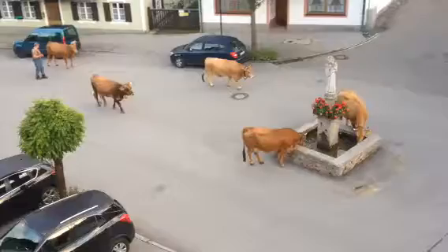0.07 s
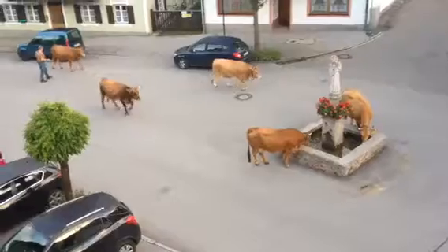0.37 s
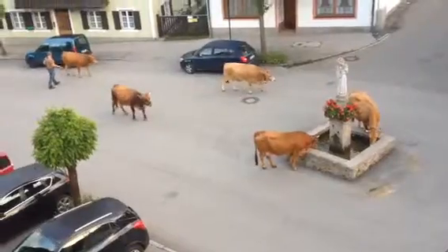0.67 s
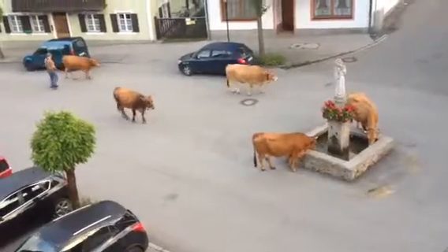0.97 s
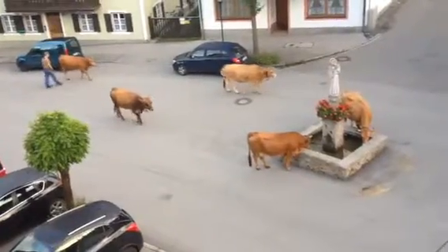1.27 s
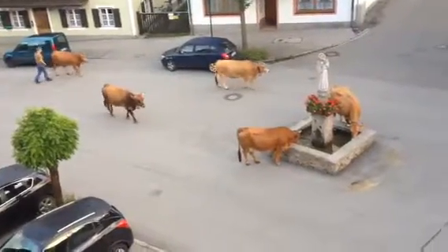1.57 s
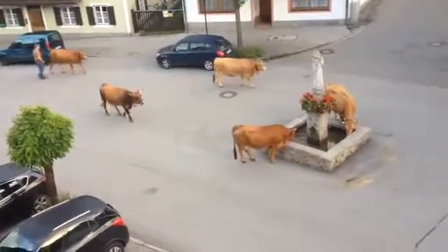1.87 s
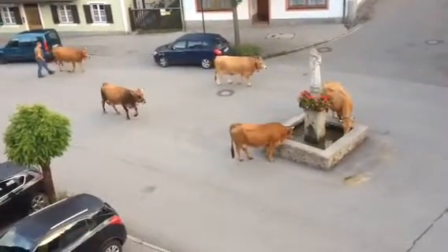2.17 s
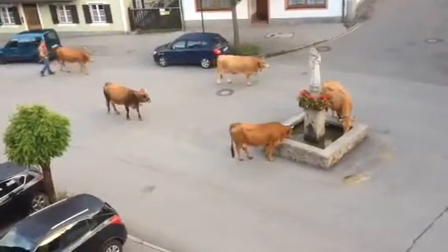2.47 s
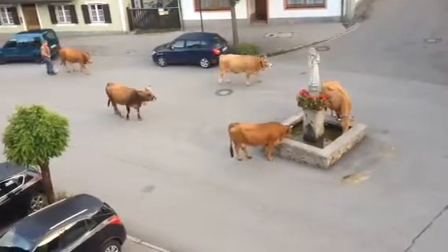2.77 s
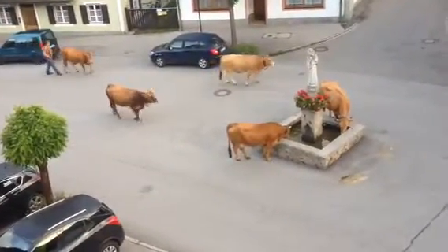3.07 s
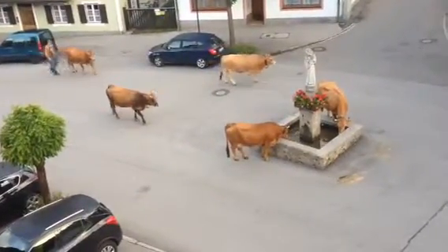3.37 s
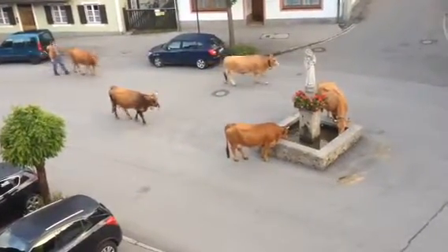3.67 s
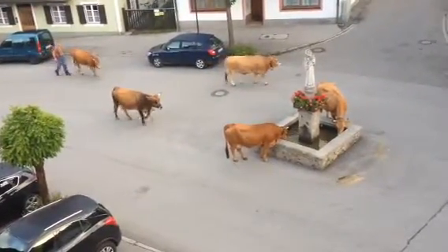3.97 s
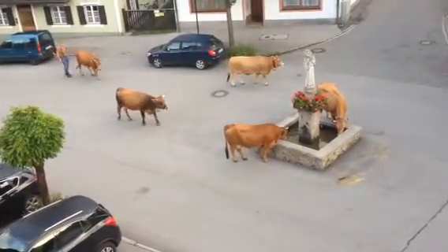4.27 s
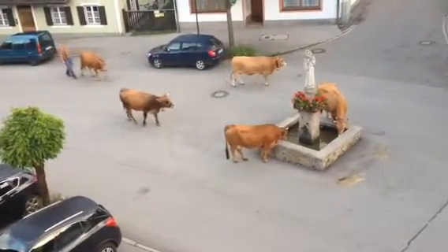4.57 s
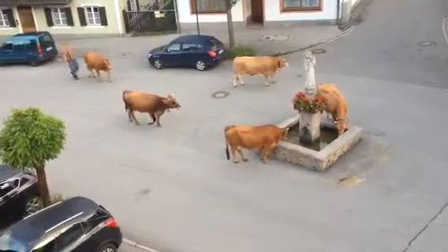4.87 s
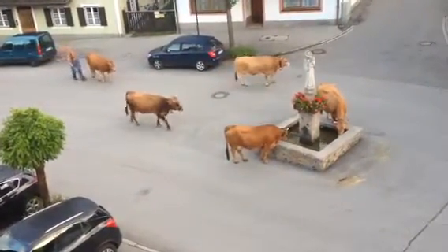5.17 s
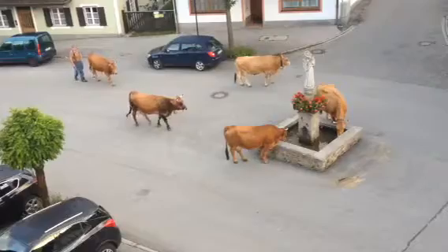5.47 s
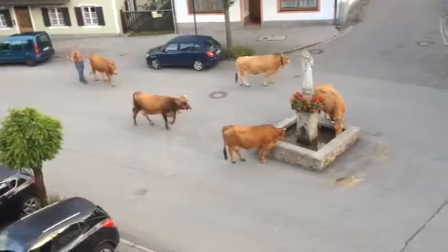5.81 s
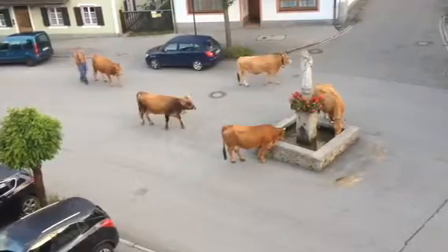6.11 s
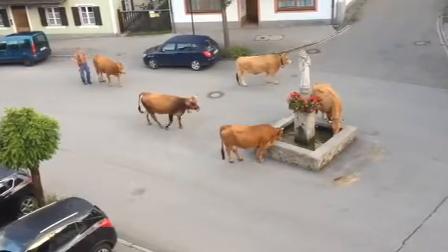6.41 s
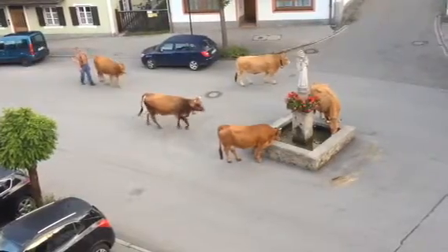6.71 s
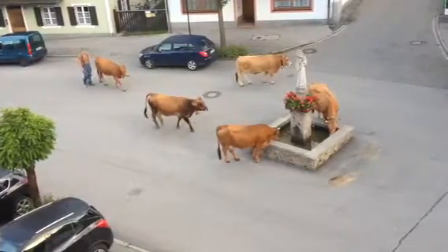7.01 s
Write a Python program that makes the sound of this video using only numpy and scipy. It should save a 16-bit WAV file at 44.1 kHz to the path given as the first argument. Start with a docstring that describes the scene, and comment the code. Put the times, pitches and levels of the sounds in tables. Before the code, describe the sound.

Metal cowbells clank and ring irregularly across a village square, with a few hoof scuffs and faint bird chirps.

```python
"""Cows cross a village square, heard from an upper window. A low village murmur cuts in with the first
clank of a sheet-metal bell: the clapper rings a body note, wall modes and a shimmer of high modes, and
the house fronts throw it back. A hoof scuffs, a bright and a deep bell join, and a distant bird chirps
now and then. The near bell grows louder from about three seconds; just after five comes a run of dry
knocks and a last scuff, and the bells clank on to the end."""
import sys
import numpy as np
from scipy import signal
from scipy.fft import rfft, irfft
from scipy.io import wavfile
from scipy.ndimage import uniform_filter1d, map_coordinates

SR = 44100
rng = np.random.default_rng(int(sys.argv[2]) if len(sys.argv) > 2 else 0)


def generate_wav(signal):
    """Clip the signal to [-1, 1] and save it as 16-bit WAV at the path in sys.argv[1]."""
    frames = np.transpose(np.atleast_2d(signal))
    scaled = np.clip(frames, -1, 1) * 32767
    pcm = np.round(scaled).astype(np.int16)
    wavfile.write(sys.argv[1], SR, pcm)


N = 319725

# tone of the village murmur: frequency_hz, level_db (table levels are relative throughout)
VILLAGE_COLOUR = [(25, 17), (70, 2.5), (100, -0.5), (140, 4.5), (200, 2.5), (320, -1), (600, 0), (1000, -1),
                  (2000, 1), (4000, -10), (7000, -14), (15000, -24.5)]
# clapper blows: start_s, strength_db, strike_place (-1..1), body_boost_db, low_wall_boost_db,
# jangle_boost_db, hardness_db_per_octave, sing_hz, sing_boost_db, second_sing_hz, second_sing_boost_db
NEAR_BLOWS = [(0.119, -41.5, 0.44, 9, 13.5, 17, -4, 3784.0, 17, 1993.0, 2),
              (0.609, -42, -0.42, 5, 4.5, 9.5, -1, 7410.0, 11, 4040.0, 16),
              (0.865, -45.5, 0.33, 3.5, 5.5, 8, 1.5, 3784.0, 14, 1993.0, -1),
              (1.16, -38.5, 0.66, 0, -1, 8.5, 0.5, 3878.0, 18, 4142.0, 5),
              (1.882, -48.5, -0.22, 9.5, 9, 1, 4, 4142.0, 17.5, 3878.0, 14),
              (2.296, -43, 1, 0, 4.5, 11.5, 2.5, 2158.0, 17.5, 3878.0, 32.5),
              (2.554, -43, 1, -4.5, -4.5, 9, 0, 1538.0, 4.5, 3945.0, 23.5),
              (3.031, -37, 0.31, -1.5, -1.5, 3.5, 3, 4142.0, 13.5, 4765.0, 3),
              (3.333, -32.5, -0.15, -3, -2.5, -2, 1, 4142.0, 4, 964.0, 8.5),
              (3.726, -25, -0.15, -4.5, -3.5, 0.5, 1.5, 964.0, 4, 4660.0, 0),
              (4.128, -31, -0.077, -5, 7.5, 7, -1, 5510.0, 16.5, 8016.0, 16),
              (4.453, -31.5, 0.62, -5, -6.5, 3.5, 2, 4660.0, 9, 3353.0, 2.5),
              (4.926, -27, -0.16, -0.5, -2.5, 2, 2.5, 4142.0, 8.5, 964.0, 7.5),
              (4.996, -45, -0.54, 3, 10, -2, -2, 3390, 12.5, 8016.0, 21),
              (5.083, -52, 0.15, 2.5, 4.5, 0, -2, 1538.0, 18.5, 7410.0, 20),
              (5.405, -40, 0.086, 1.5, 1, 6, 5.5, 3380, 6, 7023.0, 15),
              (5.494, -24, -0.51, -16, -4, -3.5, 1, 3340, 4, 3784.0, -2),
              (5.703, -28.5, -0.68, -3, -10.5, 0.5, -1, 964.0, 17.5, 3353.0, 9.5),
              (6.007, -23.5, -0.64, -4, 0.5, 2, 4.5, 7757.0, 18.5, 4040.0, 12),
              (6.075, -42, -0.26, 2, 8, 16, -5, 1538.0, 13.5, 1993.0, 16),
              (6.147, -35, 0.11, -2, 5.5, 2.5, -2, 1993.0, -1, 4142.0, 1),
              (6.4985, -19.5, -0.48, -9.5, -4.5, -2.5, 1, 3970, 10, 964.0, 9),
              (6.562, -38.5, -0.15, -15, 0.5, 8, 2, 1993.0, 20, 964.0, 14),
              (7.203, -28, -0.17, -4, -1, -4, 3.5, 7410.0, 11, 3784.0, 9)]
BRIGHT_BLOWS = [(0.508, -55.5, 1, 2.5, 2.5, 0.5, -1, 5900.0, 12.3, 7110.0, 9.2),
                (0.739, -51.5, 0.43, 3, -4.5, 0, -21, 2482, 11.6, 8578.0, 16),
                (0.936, -44.5, 0.001, 0, -5, -12, 0, 6560, 18, 5574.0, 22),
                (1.074, -48.5, 0.26, 5, 3, -5.5, 1.5, 9082.0, 18, 3852.0, 14.5),
                (1.736, -41, 0.025, -3, -5, -6, -7, 6608.0, 14.3, 7415.0, 12),
                (2.49, -49.5, -0.48, -6, -6, -4.5, -2.5, 7470, 14, 7110.0, 13),
                (2.767, -53.5, 0.19, 1.5, 2.5, 2, -3.5, 5060, 14, 3852.0, 10.3),
                (3.497, -40.5, -0.07, -2.5, -2, -7.5, -5, 8578.0, 22.5, 2506.0, 5.3),
                (3.805, -42, 0.026, -13, 3, -5.5, -2.5, 3852.0, 2.4, 6608.0, 13.3),
                (3.928, -56, 0.087, 9.5, 3, 8, -4, 2550, 8.9, 1388.0, 18),
                (5.085, -55, 0.38, 5.5, 1, -9, 0, 3778.0, 7.6, 5250.0, 8.2),
                (5.358, -34, -0.34, -0.5, -1.5, -18, -3, 7415.0, 11.6, 6608.0, 8.2),
                (5.671, -43.5, -0.21, 1, 1, -3, -0.5, 3778.0, 3.9, 2506.0, 7.5),
                (5.969, -45.5, -0.13, 1.5, 1, -5.5, -2.5, 5500, 6, 7415.0, 8.1),
                (6.385, -68.5, -0.066, 3, 18, -17, -5, 2506.0, 2, 1388.0, 3),
                (6.788, -51, -0.58, 5, 6.5, -9, 2, 1345.0, 13.7, 5108.0, 14),
                (6.892, -42, 0.011, 2.5, 0.5, 0, -5.5, 5108.0, 13.5, 7452.0, 5)]
DEEP_BLOWS = [(0.692, -50, 0.076, -2.5, 3, 5, -4, 4338.0, 20, 5102.0, 9.8),
              (0.9, -38.5, 0.18, -4, -1, -2.5, -3.5, 6340, 11.7, 4338.0, 14.5),
              (1.577, -51, 0.064, 7.5, 1.5, 1.5, -0.5, 5400.0, 18, 6790.0, 28),
              (1.622, -68, 0.17, 0, -5, -2, 0, 430.0, 28.6, 4128.0, 24),
              (1.917, -49, 0.25, 2, 1, 2.5, -5, 4980, 8.3, 3615.0, 6.7),
              (2.132, -50.5, -0.54, 1, 0, 4.5, -2.5, 3044.0, 6.6, 5400.0, 16),
              (2.474, -49, -0.35, -0.5, -2, 3, -10, 5570.0, 28, 1945.0, 8.2),
              (3.17, -57, -0.18, -6, 4, 10.5, -4.5, 430.0, 22.2, 3615.0, 11),
              (3.396, -52, -0.29, 6, 4.5, 0, 0, 1945.0, 3, 6790.0, 9.5),
              (3.468, -51, 0.23, 1, -24, 3.5, 2, 430.0, 9, 6292.0, 8.0),
              (3.682, -48.5, 0.5, -3, -1.5, -2, 0, 3044.0, 13, 2968.0, 7.7),
              (3.928, -43.0, -0.1, 1, 3.5, -6, 0, 8350, 22, 8000.0, 14),
              (4.245, -38.5, -0.0089, -7, -3.5, 0.5, -8, 5060, 11, 430.0, 5.7),
              (4.844, -51, 0.48, -1, 7, -4, 1.5, 8000.0, 15, 4128.0, 3),
              (5.358, -46, -0.045, -8, -4.5, 4, -2.5, 6663.0, 34, 7507.0, 28),
              (6.884, -50, -0.052, -3, 4, 4, -2, 6292.0, 18, 4128.0, 8.1),
              (6.895, -39.5, 0.86, -12, -12, -12.5, -1, 2855.0, 16, 3615.0, 3),
              (7.072, -63.5, -0.46, -7, 11, -2, 1, 2960, 7.1, 3044.0, 4.5)]
# bell modes: pitch_hz, level_db, t60_s, swing_db (gained as the strike place moves from 0 to 1)
NEAR_MODES = [(536.0, 12.0, 0.115, 8.0), (964.0, -30, 1.75, 3.5), (1448.0, -25.5, 0.34, -0.5),
              (1538.0, -20.5, 1.05, 13.0), (1993.0, -21.5, 0.95, -2.5), (2158.0, -28.0, 1.4, -1.5),
              (2587.0, -27.0, 0.6, 11.0), (3305.0, -27.0, 0.5, 6.0), (3353.0, -13.5, 0.2, 4.5),
              (3784.0, -18.0, 0.33, 8.0), (3878.0, -16.0, 0.15, -14.0), (3945.0, -17.5, 0.12, -2.0),
              (4040.0, -18.0, 0.22, 8.0), (4142.0, -16.5, 0.18, 6.0), (4660.0, -26.0, 0.17, -3.0),
              (4765.0, -26.0, 0.27, -2.0), (4925.0, -24.5, 0.2, 13.0), (5510.0, -20.5, 0.14, 17.0),
              (5713.0, -22.0, 0.17, 13.0), (7023.0, -27.0, 0.24, 9.0), (7410.0, -23.5, 0.17, 5.0),
              (7757.0, -21.5, 0.12, 4.0), (8016.0, -25.5, 0.14, 1.5), (8354.0, -22.0, 0.14, 4.0),
              (9044.0, -26.5, 0.14, -2.5)]
BRIGHT_MODES = [(503.0, -5.5, 0.8, 16.5), (528.0, 0.0, 0.8, -1.0), (1345.0, -21.5, 2.0, 5.0),
                (1388.0, -17.5, 2.0, -2.0), (2470.0, -12.0, 1.5, 13.0), (2506.0, -10.5, 1.6, 4.5),
                (3778.0, -8.5, 0.65, 14.0), (3852.0, -6.0, 0.6, 15.0), (4891.0, -17.5, 0.46, -8.0),
                (5108.0, -10.5, 0.26, 11.0), (5250.0, -11.5, 0.45, 12.5), (5574.0, -14.0, 0.35, -20),
                (5626.0, -24.0, 0.31, -9.0), (5790.0, -13.0, 0.26, 4.0), (5900.0, -10.5, 0.27, 11.5),
                (6608.0, -14, 0.3, -10), (7110.0, -14.5, 0.3, -1.0), (7329.0, -21.0, 0.27, -23.0),
                (7415.0, -12.5, 0.29, 13.0), (7452.0, -9.5, 0.24, 13.5), (7545.0, -16.0, 0.25, -17.0),
                (8578.0, -29.5, 0.3, 4.0), (8930.0, -19.5, 0.3, 0.5), (9082.0, -12.5, 0.18, 9.0),
                (9154.0, -17.5, 0.24, 0.0)]
DEEP_MODES = [(430.0, -8, 1.35, 4.5), (495.0, -1.5, 0.25, 1.0), (1140.0, -21.5, 2.2, 1.0),
              (1945.0, -2.5, 1.5, 12.0), (2008.0, -6.0, 1.5, -10.0), (2855.0, -13.5, 0.85, -16.0),
              (2968.0, -10.5, 0.8, -7.0), (3044.0, -8.5, 0.55, -25.0), (3615.0, -10, 0.5, 7.0),
              (4128.0, -12.0, 0.65, 15.0), (4338.0, -13.5, 0.55, -19.0), (5048.0, -18.5, 0.55, 7.0),
              (5102.0, -12.5, 0.28, 9.5), (5400.0, -13.0, 0.42, 7.5), (5570.0, -30.0, 0.5, 21.5),
              (5865.0, -19.0, 0.5, 7.0), (6140.0, -16.5, 0.25, 8.5), (6292.0, -14.5, 0.35, -2.0),
              (6663.0, -27.0, 0.28, 4.0), (6790.0, -22.5, 0.25, -10.5), (7249.0, -16.5, 0.27, -6.5),
              (7390.0, -9.0, 0.25, -6.5), (7507.0, -22.0, 0.27, -3.5), (7620.0, -19.5, 0.3, -21.0),
              (8000.0, -17.0, 0.15, 0.0), (8179.0, -24.5, 0.26, 3.5), (9938.0, -30.5, 0.23, 22.5)]
# tone of the crowded high modes and the contact tick: frequency_hz, level_db
NEAR_SHIMMER = [(1200, -12), (2500, -39.5), (4000, -23.5), (6000, -26.5), (8500, -26.5), (11000, -37),
                (15000, -46)]
BRIGHT_SHIMMER = [(1200, -1), (2500, -45), (4000, -25), (6000, -5.5), (8500, -10.5), (11000, -17),
                  (15000, -24.5)]
DEEP_SHIMMER = [(1200, -29), (2500, -20.5), (4000, -18), (6000, -18.5), (8500, -14.5), (11000, -23),
                (15000, -29)]
# the bell's upper ringing suddenly drops or lifts: start_s, change_db
NEAR_RING_STEPS = [(0.3, 0), (5.2, -13), (5.797, -9)]
BRIGHT_RING_STEPS = [(2.975, -3), (5.82, -7), (5.925, -17)]
DEEP_RING_STEPS = [(1.1, -1.5), (3.8, 2), (4.5, 2.5)]
# slaps off the ground and house fronts: delay_s, level_db
ECHOES = [(.012, -48), (.058, -18), (0.071, -20.5)]
# reverb of the square: band_hz, t60_s, level_db
REVERB_BANDS = [(241, 1.4, -8.5), (940, 0.43, -8.5), (2000, 0.7, -7.5), (3320, 1, -3.5), (5700, 0.72, -9),
                (14000, 0.42, -5)]
# hooves on paving: start_s, level_db, rise_s, t60_s, tilt_db_per_octave, grain_db
SCUFFS = [(0.25, -57.5, 0.029, 0.73, -23, 2), (2.9, -59.5, 0.093, 1, -18.5, 2),
          (3.23, -59, 0.044, 0.44, -19.5, 6), (5.675, -42, 0.03, 0.38, -7, 1)]
# tone of a scuff: frequency_hz, level_db
SCUFF_COLOUR = [(70, -38), (160, -7.5), (400, 0), (650, 16.5), (1000, 7), (1600, 16), (2500, 3),
                (5000, -13)]
# falling bird chirps: start_s, start_pitch_hz, end_pitch_hz, length_s, level_db
CHIRPS = [(1.298, 4670, 3470, 0.1, -47.5), (3.18, 4550, 3410, 0.11, -49.5),
          (4.661, 4230, 3310, 0.11, -49.5), (5.275, 5100, 4130, 0.044, -45.5),
          (6.683, 3080, 2910, 0.061, -44)]
# dry knocks close by: start_s, level_db, t60_s, thud_db, tilt_db_per_octave
KNOCKS = [(5.207, -39, 0.021, -31, 21), (5.269, -39, 0.04, -34, 6), (5.331, -46, 0.18, -14, 9.5),
          (5.65, -37, 0.094, 3.5, 7), (5.677, -41.5, 0.07, 0, -4), (5.743, -39.5, 0.06, 1, -5)]
# tone of a knock: frequency_hz, level_db
KNOCK_COLOUR = [(300, -14), (900, -25), (1300, 24.5), (2100, 25.5), (3500, 16), (6000, 0.5), (14000, -23)]


def undb(db):
    """Decibels to gain."""
    return 10 ** (np.asarray(db) / 20)


def seconds(length):
    """Time axis of the given length."""
    return np.arange(int(length * SR)) / SR


def fade(t, t60):
    """Free decay, 60 dB down after t60."""
    return np.exp(-np.log(1000) * t / t60)


def add(track, start_s, sound):
    """Lay a sound into the track."""
    start = max(int(start_s * SR), 0)
    track[start:start + len(sound)] += sound[:max(N - start, 0)]


def along(hz, points):
    """Read a curve on a log-frequency axis."""
    points = np.asarray(points, float)
    return np.interp(np.log(np.maximum(hz, 1)), np.log(points[:, 0]), points[:, 1])


def noise(size, colour, tilt_db=0):
    """Coloured noise of rms 1, tilted by tilt_db per octave above 250 Hz."""
    hz = np.maximum(np.fft.rfftfreq(size, 1 / SR), 1)
    gain = undb(along(hz, colour) + tilt_db * np.log2(np.maximum(hz / 250, 1)))
    x = irfft(rfft(rng.standard_normal(size)) * gain, size)
    return x / x.std()


def high_pass(x, hz, order):
    """Roll off the bass."""
    return signal.sosfilt(signal.butter(order, hz, "high", fs=SR, output="sos"), x)


def drift(t, rate):
    """Smooth random motion with a spread near 1, heading for a new value rate times a second."""
    knots = rng.standard_normal(int(N / SR * rate) + 3)
    return map_coordinates(knots, [t * rate], order=2, mode="nearest")


def village(level_db=-59, waver_db=1.3):
    """A low, nearly steady bed of distant noise."""
    return undb(level_db + waver_db * drift(np.arange(N) / SR, rate=5)) * noise(N, VILLAGE_COLOUR)


def swell(age, hz, swell_s):
    """The attack: vibration needs a moment to spread over the wall, and low modes take longest."""
    return np.minimum(age / (swell_s * np.sqrt(500 / hz)), 1)


def wall_modes(times, db, hz, t60, swell_s, steps, sway_per_s=9, sway_m=.012, sway_db=1.8, bend=.01):
    """Each blow adds energy to the modes (db: blows x modes); they waver as the bell sways on its strap."""
    now = np.arange(N) / SR
    t = now[::48]  # coarse clock for the envelopes
    age = np.maximum(t - times[:, None], 0)
    step_db = sum(change * (times < s)[:, None] * np.clip((t - s) / .015, 0, 1) for s, change in steps)
    heard = now + np.interp(now, t, drift(t, sway_per_s)) * sway_m / 343  # Doppler wobble
    # the mouth nears and leaves the cow's chest, which bends the short, low cavity note
    bent = heard + bend * np.cumsum(np.interp(now, t, drift(t, sway_per_s))) / SR
    out = np.zeros(N)
    for f, decay, levels in zip(hz, t60, db.T):
        upper, cavity = f > 1200, f < 700 and decay < .5
        rings = undb(levels)[:, None] * fade(np.minimum(age, 2 * decay), decay) * swell(age, f, swell_s)
        waver = undb(drift(t, sway_per_s) * sway_db * upper)
        envelope = np.linalg.norm(rings * undb(step_db) if upper else rings, axis=0) * waver
        cycles = f * (bent if cavity else heard) + rng.random()
        out += np.interp(now, t, envelope) * np.sin(np.float32(2 * np.pi * (cycles % 1)))
    return out


def shimmer_modes(times, db, hz, t60, swell_s, length_s=0.42):
    """Every touch rings the same crowd of modes, each at its own level (db: touches x modes) and sign."""
    t = seconds(length_s)
    tones = np.sin(2 * np.pi * hz[:, None] * t) * fade(t, t60[:, None])
    fade_out = np.minimum(10 * (1 - t / length_s), 1)
    tones = tones * swell(t, hz[:, None], swell_s) * fade_out
    strength = undb(db) * rng.choice([-1, 1], db.shape)
    out = np.zeros(N)
    for s, clank in zip(times, strength @ tones):
        add(out, s, clank)
    return out


def cowbell(blows, ring_steps, modes, shimmer, shimmer_t60, shimmer_count,
            graze_db, rebound_db, rattle_s, tick_db, swell_s, shimmer_db=-2):
    """A clapper hits sheet metal: where it lands picks the modes, and a harder contact jangles brighter."""
    blows = np.array(blows, float).T[:, :, None]
    start_s, db, place, body_db, low_wall_db, jangle_db, hardness = blows[:7]
    hz, mode_db, t60, swing_db = np.array(modes, float).T
    boost_db = np.select([hz < 700, hz < 2700], [body_db, low_wall_db])
    wall_db = db + mode_db + np.clip(place, -1, 1) * swing_db + boost_db
    # the two modes that are struck on their bellies sing out
    for sing_hz, sing_db in (blows[7:9], blows[9:]):
        nearest_hz = hz[np.abs(hz - sing_hz).argmin(axis=1)]
        wall_db = wall_db + sing_db * (hz == nearest_hz[:, None])
    walls = wall_modes(start_s[:, 0], wall_db, hz, t60, swell_s, ring_steps)
    high_hz = np.linspace(2300, 15400, shimmer_count) + rng.uniform(-50, 50, size=shimmer_count)
    tilt_db = hardness * np.maximum(np.log2(high_hz / 3500), -1)
    high_db = db + jangle_db + shimmer_db + along(high_hz, shimmer) + tilt_db
    # the loose clapper rattles: a first graze, then three weakening rebounds at uneven gaps
    gaps = rattle_s * rng.uniform(.4, 1.6, (len(start_s), 3)) * np.arange(1, 4)
    touch_s = start_s + np.c_[np.zeros(len(start_s)), np.cumsum(gaps, axis=1)]
    touch_db = np.vstack([high_db + step for step in (graze_db, 0, rebound_db, 2 * rebound_db)])
    # each touch favours a few high modes, and the highest die soonest
    touch_db += 6 * np.minimum(rng.standard_normal(touch_db.shape), 1.8)
    high_t60 = shimmer_t60 * (high_hz / 6000) ** -.4
    jangle = shimmer_modes(touch_s.T.ravel(), touch_db, high_hz, high_t60, swell_s)
    # the contact itself is a short tick
    t, ticks = seconds(0.02), np.zeros(N)
    for s, contact_db in zip(start_s[:, 0], (db + jangle_db)[:, 0]):
        add(ticks, s, undb(contact_db + tick_db) * fade(t, t60=0.042) * noise(len(t), shimmer))
    ticks = high_pass(ticks, 2200, order=3)
    return high_pass(walls + jangle + ticks, 340, order=4)  # so small a bell radiates no bass


def square_response(build_s=0.01):
    """What the ground and the houses send back to one spot: a few slaps and a diffuse tail."""
    t = seconds(0.78)
    hz, white = np.fft.rfftfreq(len(t), 1 / SR), rfft(rng.standard_normal(len(t)))
    band_hz = np.array(REVERB_BANDS)[:, 0]
    out = np.zeros(len(t))
    for share, (_, t60, db) in zip(np.eye(len(band_hz)), REVERB_BANDS):
        band = irfft(white * along(hz, np.c_[band_hz, share]), len(t))
        envelope = fade(t, t60) * np.minimum(t / build_s, 1)
        out += undb(db) * band * envelope / np.linalg.norm(envelope)
    for delay_s, db in ECHOES:
        out[int(delay_s * rng.uniform(.95, 1.05) * SR)] += undb(db)
    return out


def square_reverb(send):
    """The bells swing and move on, so their echoes keep crossfading into new ones."""
    hop, out = SR // 3, np.zeros(N)
    window = np.sin(np.pi * np.arange(2 * hop) / (2 * hop))
    for start in range(-hop, N, hop):
        piece = send[max(start, 0):start + 2 * hop]
        piece = piece * window[max(-start, 0):][:len(piece)]
        add(out, max(start, 0) / SR, signal.fftconvolve(piece, square_response()))
    return out


def hoof_scuffs():
    """Hooves drag on the paving: grainy scrapes that swell and die away."""
    t, out = seconds(1), np.zeros(N)
    for s, db, rise_s, t60, tilt_db, grain_db in SCUFFS:
        grain = uniform_filter1d(rng.standard_normal(len(t)), size=160)
        grit = undb(grain_db * np.tanh(grain / grain.std()))
        envelope = np.minimum(t / rise_s, 1) * fade(np.maximum(t - rise_s, 0), t60)
        add(out, s, undb(db) * envelope * grit * noise(len(t), SCUFF_COLOUR, tilt_db))
    return out


def bird(warble_hz=70, warble_depth=0.042):
    """Thin whistles that slide down, with a fast warble that makes them buzz."""
    out = np.zeros(N)
    for s, start_hz, end_hz, length_s, db in CHIRPS:
        t = seconds(length_s)
        glide_hz = start_hz * (end_hz / start_hz) ** (t / length_s)
        hz = glide_hz * (1 + warble_depth * np.sin(2 * np.pi * warble_hz * t))
        envelope = np.sin(np.pi * np.sqrt(t / length_s))
        add(out, s, undb(db) * envelope * np.sin(2 * np.pi * np.cumsum(hz) / SR))
    return out


def knocks(thud_hz=450, thud_t60=0.082):
    """Short dry clacks, some with a hollow thud underneath."""
    t, out = seconds(0.095), np.zeros(N)
    for s, db, t60, thud_db, tilt_db in KNOCKS:
        thud = undb(thud_db) * np.sin(2 * np.pi * thud_hz * t) * fade(t, thud_t60)
        clack = noise(len(t), KNOCK_COLOUR, tilt_db) * fade(t, t60)
        add(out, s, undb(db) * (clack + thud))
    return out


def scene():
    """A mono mix on two channels: the farther the source, the wetter it sits."""
    near = cowbell(NEAR_BLOWS, NEAR_RING_STEPS, NEAR_MODES, NEAR_SHIMMER,
                   shimmer_t60=0.079, shimmer_count=68,
                   graze_db=1.5, rebound_db=-9, rattle_s=0.012, tick_db=-7, swell_s=0.013)
    deep = cowbell(DEEP_BLOWS, DEEP_RING_STEPS, DEEP_MODES, DEEP_SHIMMER,
                   shimmer_t60=0.15, shimmer_count=48,
                   graze_db=3, rebound_db=-0.5, rattle_s=0.017, tick_db=-6, swell_s=0.0042)
    bright = cowbell(BRIGHT_BLOWS, BRIGHT_RING_STEPS, BRIGHT_MODES, BRIGHT_SHIMMER,
                     shimmer_t60=0.16, shimmer_count=54,
                     graze_db=2.5, rebound_db=-6.5, rattle_s=0.013, tick_db=6.5, swell_s=0.014)
    scuffs, chirps = hoof_scuffs(), bird()
    direct = near + deep + bright + scuffs + undb(-8.5) * chirps + knocks()
    send = undb(2.0) * near + undb(4.5) * (deep + bright) + undb(5.0) * scuffs + undb(1.0) * chirps
    return np.tile(direct + square_reverb(send) + village(), (2, 1))


def record(dry, open_s=.118, top_hz=15400):
    """A small microphone, light on bass, with a steep top cut; the sound cuts in after a brief silence."""
    opened = high_pass(dry, 143, order=3) * (np.arange(N) / SR >= open_s)
    return signal.sosfilt(signal.ellip(10, .2, 80, top_hz, fs=SR, output="sos"), opened)


dry = scene()
out = record(dry)
generate_wav(out)
```